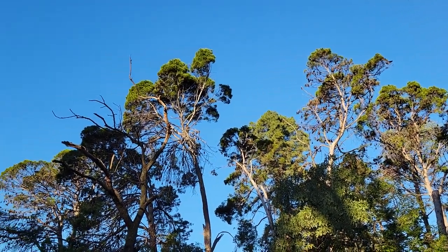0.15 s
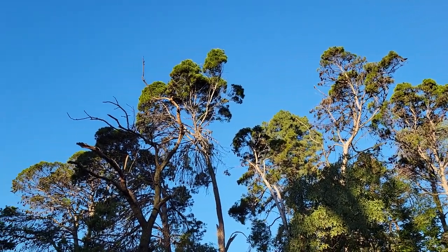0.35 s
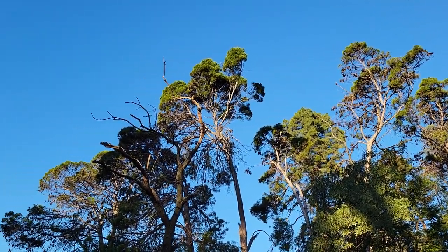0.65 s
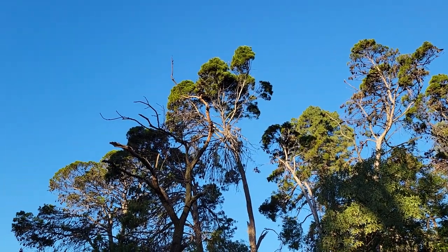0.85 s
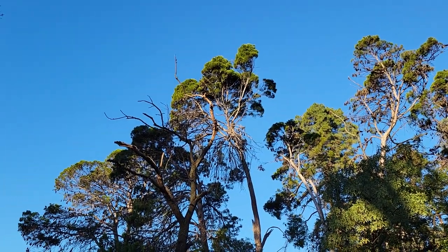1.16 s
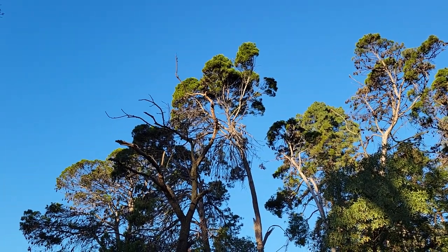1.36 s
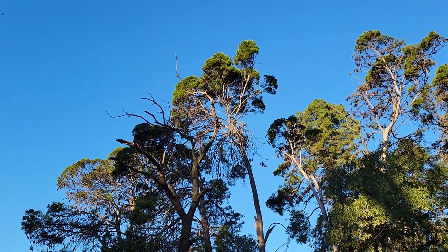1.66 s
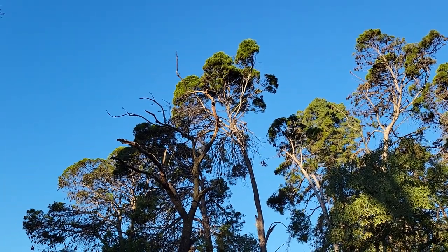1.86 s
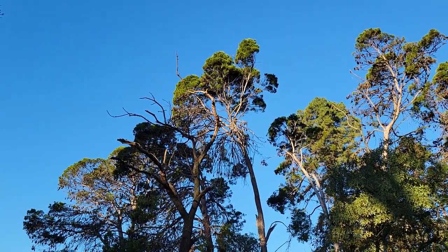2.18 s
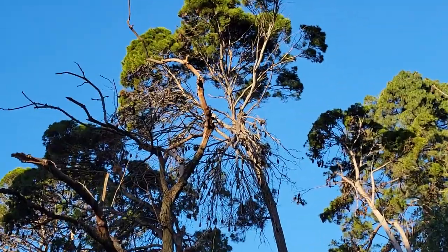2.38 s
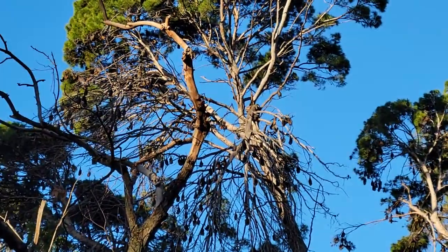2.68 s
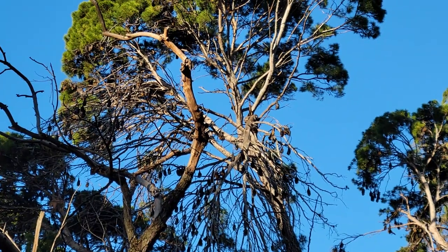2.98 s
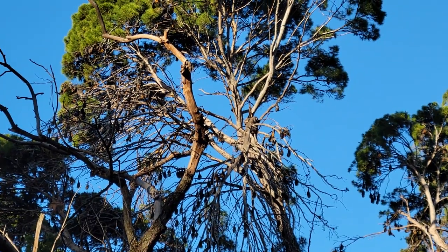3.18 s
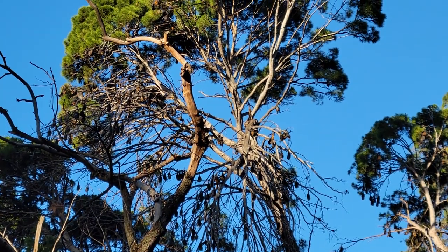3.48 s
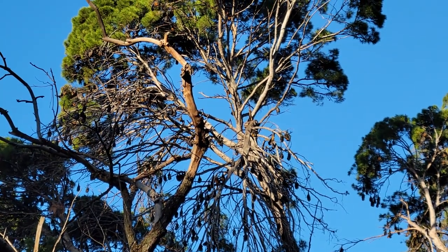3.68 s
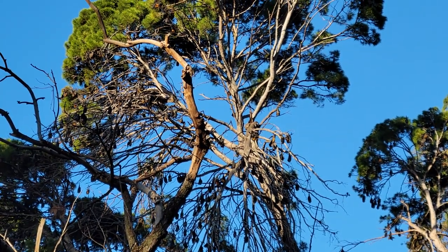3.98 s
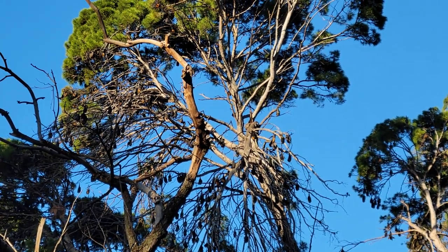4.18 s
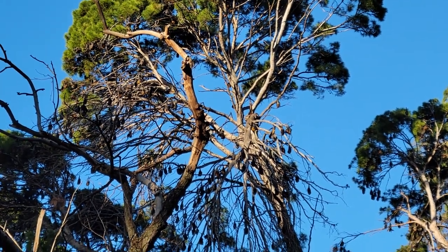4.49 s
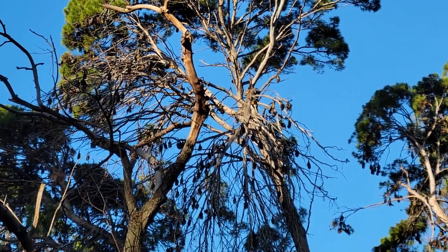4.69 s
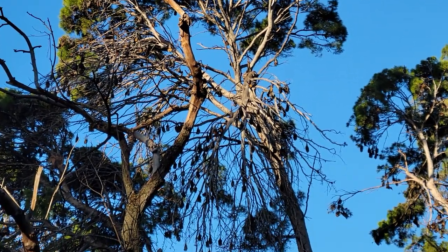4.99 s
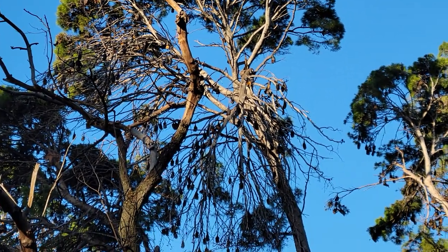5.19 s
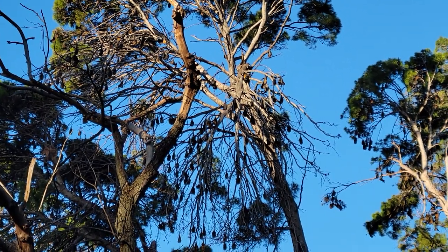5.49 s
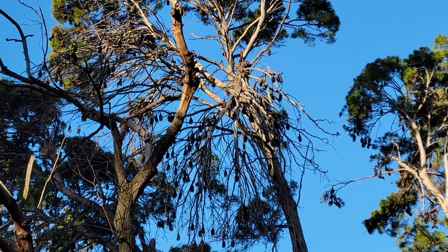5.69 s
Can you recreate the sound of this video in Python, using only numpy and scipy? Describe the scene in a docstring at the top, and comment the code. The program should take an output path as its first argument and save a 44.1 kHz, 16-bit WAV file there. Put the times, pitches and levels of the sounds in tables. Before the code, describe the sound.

Outdoors beneath tall trees, hundreds of roosting bats blend into a dense shrill chatter, with nearer chirps and hoarse screeches standing out. Under it run soft road rumble and a lorry engine that climbs, drops at a gear change around two seconds, and climbs again. The colony gets louder and brighter in the last second and a half. Wide stereo pickup, with a short leafy wash.

```python
"""A colony of flying foxes roosts in tall trees. Hundreds of far voices blur into a shrill chorus, nearer animals squeak
and screech out of it, and a thin high whistle glides twice. A lorry engine pulls away, changes gear and pulls again
over the rumble of a road. Two microphone ports a hand apart; the left one faces the colony."""
import sys
import numpy as np
from scipy import signal
from scipy.fft import rfft, irfft
from scipy.io import wavfile
from scipy.ndimage import uniform_filter1d

SR = 44100
rng = np.random.default_rng(int(sys.argv[2]) if len(sys.argv) > 2 else 0)


def transcribe(u):
    """Save the signal u as a 16-bit wav file named by the first command-line argument.

    u: samples, shape (n,) or (channels, n), limited to [-1, 1]; the rate is SR.
    q: integer samples, one column per channel.
    """
    v = np.clip(np.atleast_2d(u).T, -1, 1)
    q = np.round(v * 32767).astype(np.int16)
    wavfile.write(sys.argv[1], SR, q)


N = 257984

# the chorus swells and sinks: (s, level dB)
CHORUS = [(0.0, -40), (0.28, -43), (1.71, -40), (2.1, -43.5), (2.56, -38.5), (2.66, -44.5), (2.74, -41), (3.49, -38),
          (3.89, -40.5), (4.1, -39.5), (4.12, -40), (4.45, -35), (4.64, -39.5), (4.95, -35.5), (5.05, -32.5), (5.34, -34.5),
          (5.82, -34), (5.85, -35)]
CHORUS_COLOUR = [(710, -46), (1200, -12.5), (1490, -21), (2260, -8), (2800, -1.5), (3400, -1), (5220, -15.5), (8100, -18.5),
                 (9520, -18.5), (10900, -24.5), (12200, -18.5), (12900, -17.5), (14600, -25), (15600, -36)]   # (Hz, dB per Hz)
# far calls a second, and the level in dB of those too far to tell apart
CALLS_PER_S, BLUR_DB = 520, -1   # fixed
# near squeaks, one clear partial each: (s, length s, start Hz, end Hz, dB, left-right dB)
SQUEAKS = [(0.017, 0.054, 4240, 4460, -44, -4), (0.122, 0.043, 4130, 4150, -45, -4), (0.231, 0.08, 4440, 3140, -44.5, -8),
           (0.2, 0.039, 4500, 4700, -44, -6), (0.287, 0.076, 3130, 3070, -47.5, -8), (0.458, 0.068, 3700, 2620, -41.5, -6), (0.702, 0.035, 2850, 2800, -45, -4), (0.702, 0.22, 4500, 4530, -50.5, -7),
           (0.977, 0.09, 4550, 4950, -48, -6), (1.016, 0.09, 2200, 2365, -50, -5), (1.088, 0.04, 3630, 2840, -43, -4), (1.132, 0.028, 3510, 3570, -39, -2),
           (1.31, 0.051, 2910, 2760, -41.5, -7), (1.411, 0.077, 3560, 3260, -40.5, -2), (1.436, 0.044, 3830, 3770, -38, -1),
           (1.508, 0.063, 3950, 3950, -43, -4), (1.642, 0.043, 3630, 3450, -38.5, 1), (1.902, 0.059, 2190, 2420, -47, -8),
           (2.246, 0.067, 2564, 2950, -46, -1), (2.314, 0.09, 2810, 3190, -45, 3), (2.397, 0.075, 2955, 3550, -39.5, -2), (2.42, 0.12, 2450, 2750, -48.5, 2), (2.425, 0.037, 1593, 1800, -43, 0),
           (2.474, 0.11, 2950, 3350, -43.5, -1), (2.482, 0.04, 4570, 4450, -40, 1), (2.552, 0.07, 3240, 3950, -38, 2),
           (2.692, 0.14, 2020, 1966, -45, 4), (2.705, 0.14, 2442, 2452, -41, 3), (2.763, 0.063, 3500, 3440, -41.5, 3),
           (2.862, 0.14, 2480, 2550, -43, 6), (2.952, 0.032, 6120, 5660, -49.5, 1), (2.992, 0.056, 6370, 6260, -47, 1),
           (3.037, 0.06, 3300, 3080, -41, -6), (3.041, 0.12, 2870, 2800, -40, -2), (3.197, 0.081, 3220, 3300, -39, -2),
           (3.223, 0.078, 2700, 2730, -45, -2), (3.357, 0.11, 7500, 7850, -52, -3), (3.301, 0.088, 3020, 2800, -43, 2),
           (3.385, 0.044, 2580, 2706, -41, 4), (3.501, 0.071, 2940, 2790, -41.5, 3), (3.701, 0.08, 2954, 2740, -44.5, 1),
           (3.738, 0.073, 3600, 3270, -42, 2), (4.007, 0.068, 4250, 3300, -38.5, -6.5), (4.039, 0.08, 3240, 3128, -36, 0),
           (4.11, 0.04, 2100, 2000, -43, 3), (4.182, 0.055, 3005, 3310, -41, 0), (4.313, 0.093, 3400, 2996, -37.5, 0), (4.343, 0.08, 2146, 2207, -35.5, 4),
           (4.39, 0.081, 2167, 2475, -38, 4), (4.415, 0.066, 3670, 3630, -45, 5), (4.426, 0.11, 2920, 2850, -38.5, -1),
           (4.775, 0.109, 2118, 2257, -41, 3), (4.869, 0.068, 3343, 3283, -34.5, -3), (4.927, 0.045, 7700, 7400, -50, 2),
           (4.92, 0.093, 2410, 2580, -44.5, 4), (5.001, 0.037, 6630, 6430, -33.5, -8), (5.03, 0.1, 2940, 2950, -33, -1),
           (4.992, 0.031, 3390, 3310, -32, -1), (5.03, 0.065, 2520, 2600, -39, 0),
           (5.111, 0.11, 2660, 2800, -40, 7), (5.23, 0.13, 2820, 3106, -36, 3), (5.245, 0.033, 1100, 1120, -46.5, 9),
           (5.453, 0.042, 7970, 7700, -50, -7), (5.471, 0.13, 2940, 2940, -41, 11), (5.5, 0.12, 7920, 7740, -53.5, -4),
           (5.572, 0.12, 3210, 3560, -40.5, 3), (5.595, 0.078, 7600, 7830, -51, -5), (5.647, 0.086, 4580, 4830, -43.5, 6),
           (5.658, 0.044, 3110, 3100, -39, 6), (5.691, 0.043, 2040, 2096, -43, -2), (5.693, 0.14, 4100, 4150, -40, -1)]
# near screeches: (s, length s, start Hz, end Hz, level dB, dB gained per harmonic, left-right dB)
SCREECHES = [(0.0, 0.064, 2722, 2710, -57, 3, 7), (0.117, 0.066, 3530, 3150, -41, -1.5, -3), (0.36, 0.14, 1860, 1960, -43, -1.5, -2),
             (2.468, 0.05, 4585, 4670, -39, -12, 4), (2.511, 0.09, 4755, 4870, -30.5, -16, 1), (2.599, 0.16, 4250, 4200, -37, -6, -1),
             (3.44, 0.067, 3520, 3240, -37, -4.5, 2), (4.127, 0.14, 1844, 2010, -38.5, -2.5, -1), (4.383, 0.12, 2270, 2560, -53.5, 3.5, -7),
             (4.942, 0.09, 2970, 3230, -32.5, -4, -1), (5.031, 0.36, 3256, 3440, -44.5, 3.5, -5.5)]
# high whistles: (s, Hz, dB)
WHISTLES = [[(2.22, 13000, -70), (2.31, 14400, -66), (2.35, 15100, -63), (2.42, 14500, -66), (2.49, 15100, -61), (2.6, 14720, -60),
             (2.67, 15050, -60), (2.76, 15300, -57), (2.86, 14500, -62), (2.95, 12800, -68)],  # fixed
            [(5.62, 13350, -62), (5.72, 15250, -53), (5.8, 15520, -53)]]  # fixed
# the lorry: (s, firing pattern Hz, dB of its multiples 3, 4 and 5)
LORRY = [(0.0, 29.9, -54, -41, -49), (0.93, 30.6, -49, -49, -51), (1.02, 31.2, -50, -49, -66), (1.53, 35.7, -52, -44, -58), (1.66, 35, -44, -55, -66),
         (2.12, 20.0, -48, -52, -55), (2.38, 19.9, -50, -45, -56), (2.66, 20.4, -44, -46, -43), (2.95, 21.4, -43, -39, -45), (3.55, 23.3, -41, -48, -48),
         (3.81, 24.2, -45, -39, -46), (4.45, 27.9, -48, -43, -54), (5.03, 27.8, -48, -48, -52), (5.42, 29.4, -53, -39, -54),
         (5.85, 31.8, -50, -44, -52)]  # fixed
# the road: (s, rumble dB, tyre roar dB)
ROAD = [(0, -42, -46), (.35, -46, -45), (.7, -41.5, -46), (.9, -46, -45.5), (1.8, -40, -45), (2.28, -45.5, -49.5), (2.5, -40.5, -47),
        (2.9, -39.5, -45.5), (3.6, -39, -46.5), (4.2, -42, -47), (5, -41.5, -47), (5.45, -43.5, -46), (5.85, -40, -46.5)]
RUMBLE = [(8.8, -39), (15, -13), (48, -1.5), (76, -3), (122, -9.5), (182, -20.5), (250, -26), (320, -31), (550, -120)]   # (Hz, dB per Hz)
ROAR = [(76, -42), (130, -18), (183, -13.5), (316, -16.5), (382, -12.5), (627, -15.5), (1470, -16), (2200, -14), (2860, -57),
        (4840, -120)]   # (Hz, dB per Hz)
LIKENESS = [(60, 0.9), (130, 1), (290, 0.82), (640, 0.2), (1400, -0.51), (2200, -0.62)]   # (Hz, left-right likeness of the road)
PORTS = [(100, -0.8), (700, -1.5), (3000, -4), (5200, -1), (7000, -3), (9200, 3), (11000, 2), (12500, -5), (15000, -8.5)]   # (Hz, left-right dB)
LAG_SAMPLES = 16.5   # the right port hears the colony later
TREES_T60_S, TREES_DB = .25, 0
CUTOFF_HZ = 15750   # fixed
HUM = [(0, -44), (.3, -62), (.67, -48.5), (1.19, -38), (1.68, -41.5), (1.95, -63), (3.6, -41.5), (4.7, -46.5), (5, -42), (5.2, -48), (5.45, -42), (5.85, -48)]   # a steadier hum: (s, dB)
# level of the treble: (s, dB of the shrill edge 4-5.4 kHz, dB at 5.4-8.4 kHz, dB above 8.4 kHz)
TREBLE = [(0.0, -41.5, -52, -58), (0.16, -44.5, -53.5, -51.5), (0.28, -50, -50, -59.5), (0.67, -46.5, -57.5, -60.5),
          (0.94, -47, -53, -59), (1.09, -44, -49.5, -51), (1.14, -51.5, -53, -61.5), (1.84, -45, -50, -55.5),
          (2.07, -50, -52, -53), (2.25, -54, -50.5, -60), (2.61, -45.5, -50, -54), (3.0, -52, -51.5, -60),
          (3.49, -45.5, -49.5, -51), (4.01, -50.5, -50.5, -58), (4.22, -48, -50.5, -56), (4.33, -48, -51, -57),
          (4.43, -49, -51, -44.5), (4.58, -46, -46.5, -51), (5.0, -47, -41.5, -50.5), (5.25, -43.5, -42.5, -50),
          (5.47, -42.5, -41, -50), (5.85, -40, -43.5, -53.5)]
THROAT = [(1800, -16), (3500, 0), (5800, -8), (7600, -23), (9800, -11), (12000, -8), (14500, -29)]   # (Hz, dB) colour of a screech
HUM_HZ, HUM_WAVER_HZ = 60.2, 1.48
EDGE_DB = None
FLICKER_DB, FLICKERS_PER_S = 1, 10   # each band flickers on its own
NEAR_TREES_DB = -5   # near animals stand further out of the wash


def amp(db):
    """dB to gain."""
    return 10 ** (np.asarray(db) / 20)


def rms_one(x):
    """Scales to rms 1."""
    return x / np.sqrt(np.mean(x ** 2) + 1e-20)


def in_time(rows):
    """Columns of a curve at every sample."""
    s, *columns = np.transpose(rows)
    return [np.interp(np.arange(N) / SR, s, c) for c in columns]


def at_hz(points):
    """A (Hz, value) table on the bins of an N-point spectrum."""
    hz, value = np.transpose(points)
    return np.interp(np.log(np.arange(N // 2 + 1) * SR / N + 1), np.log(hz), value)


def drift(rate, size):
    """Slow chance of spread 1, a new value rate times a second."""
    return np.interp(np.arange(size) * rate / SR, np.arange(size * rate // SR + 2), rng.standard_normal(int(size * rate // SR + 2)))


def add(out, s, length, start_hz, end_hz, harmonics_db, pan_db, lag, rough, chatter_db, soft=0.71):
    """One call: a harmonic stack that glides; its pitch trembles and its strength stutters."""
    size = int(length * SR) + 64
    along = np.linspace(0, 1, size)
    pitch = (start_hz + (end_hz - start_hz) * along) * (1 + rough * drift(400, size))
    phase = 2 * np.pi * np.cumsum(pitch) / SR + rng.uniform(0, 2 * np.pi)
    call = sum(amp(db) * np.sin(k * phase) for k, db in enumerate(harmonics_db, 1) if k * pitch.max() < .45 * SR)  # fixed
    swell = np.sin(np.pi * along ** 0.9).clip(0) ** soft   # a little quicker to start than to fade
    call = call * swell * amp(chatter_db * drift(90, size)) * np.sqrt(2)
    for side, delay, gain in ((0, 0, amp(pan_db / 2)), (1, lag, amp(-pan_db / 2))):
        at = max(int(s * SR + delay), 0)
        out[side, at:at + size] += gain * call[:N - at]


def trees(x, wet_db):
    """Trunks and leaves scatter a short dying wash, another one at each port."""
    t = np.arange(int(TREES_T60_S * SR)) / SR
    wash = rng.standard_normal((2, len(t))) * amp(-60 * t / TREES_T60_S) * (t > .004)
    wash = wash / np.sqrt((wash ** 2).sum(axis=1, keepdims=True))
    return x + amp(wet_db) * signal.fftconvolve(x, wash, axes=1)[:, :N]


def chorus():
    """Short hoarse far calls at random, mostly from one side, over a blur of still farther ones."""
    levels_db = in_time(CHORUS) + in_time(TREBLE)
    calls = np.zeros((2, N))
    for s, length, pitch, glide, loud, pan, lag, bright, hoarse in rng.random((int(CALLS_PER_S * N / SR), 9)):
        hz = 1700 * 2.9 ** pitch
        overtones_db = 5 * loud - (4 + 6 * bright) * np.arange(8) + rng.normal(0, 1.5, 8)
        spot = LAG_SAMPLES + 2 * (lag - .5) if lag < .45 else 72 * (lag - .72)
        add(calls, s * N / SR, .015 + .06 * length ** 3, hz, hz * (.82 + .34 * glide), overtones_db, 8 * (pan - .5), spot,
            rough=.006 + .04 * hoarse ** 3, chatter_db=5)  # fixed
    calls = rfft(trees(calls, TREES_DB))
    calls = calls / np.sqrt(uniform_filter1d(np.abs(calls) ** 2, size=4000) + 1e-9)   # even colour before the colony's own
    left, other = rng.standard_normal((2, N))
    blur = rfft([left, .35 * np.roll(left, round(LAG_SAMPLES)) + .94 * other]) / np.sqrt(N)  # fixed
    both = (calls + amp(BLUR_DB) * blur) * amp(at_hz(CHORUS_COLOUR))
    steps = [1, above(4056), above(5440), above(8430), 0]
    bands = (rms_one(irfft(both * (low - high), N)) for low, high in zip(steps, steps[1:]))
    return sum(amp(db + FLICKER_DB * drift(FLICKERS_PER_S, N)) * band for db, band in zip(levels_db, bands))


def near_bats():
    """Squeaks are almost pure, screeches are rich and a little hoarse."""
    out, order = np.zeros((2, N)), np.arange(6)
    throat_hz, throat_db = np.transpose(THROAT)
    for s, length, start_hz, end_hz, db, pan_db in SQUEAKS:
        add(out, s, length, start_hz, end_hz, [db, db - 21], pan_db, LAG_SAMPLES, rough=0.013, chatter_db=3.0)
    for s, length, start_hz, end_hz, db, gain_db, pan_db in SCREECHES:
        harmonics_db = db + gain_db * order + np.interp((order + 1) * (start_hz + end_hz) / 2, throat_hz, throat_db)
        add(out, s, length, start_hz, end_hz, harmonics_db, pan_db, LAG_SAMPLES, rough=0.0085, chatter_db=2.5, soft=0.38)
    return trees(out, NEAR_TREES_DB)


def whistles():
    """Thin pure tones near the top of hearing, gliding without corners."""
    out, t = 0, np.arange(N) / SR
    for rows in WHISTLES:
        hz, db = in_time(rows)
        sounding = np.clip(np.minimum(t - rows[0][0], rows[-1][0] - t) / .04, 0, 1)  # fixed
        phase = 2 * np.pi * np.cumsum(uniform_filter1d(hz, size=1500) + 60 * drift(150, N)) / SR
        out = out + sounding * amp(db + 3.5 * drift(40, N)) * np.sqrt(2) * np.sin(phase)
    return out


def lorry():
    """Low orders of the firing pattern, wavering on their way; and the hum."""
    (hz, *orders_db), (hum_db,) = in_time(LORRY), in_time(HUM)
    phase = 2 * np.pi * np.cumsum(hz) / SR
    orders = sum(amp(db + 2.0 * drift(6.1, N)) * np.sin(k * phase + k * k) for k, db in enumerate(orders_db, 3))
    hum = amp(hum_db + 1.0 * drift(6.3, N)) * np.sin(2 * np.pi * np.cumsum(HUM_HZ + HUM_WAVER_HZ * drift(3, N)) / SR)
    return np.sqrt(2) * (orders + hum)


def road():
    """Diffuse traffic noise, alike at both ports only in the bass."""
    rumble_db, roar_db = in_time(ROAD)
    alike = np.clip(at_hz(LIKENESS), -1, 1)
    mid, side = rfft(rng.standard_normal((2, N)))
    noise = np.sqrt(1 + alike) * mid + np.sqrt(1 - alike) * side * [[1], [-1]]
    rumble, roar = (rms_one(irfft(noise * amp(at_hz(colour)), N)) for colour in (RUMBLE, ROAR))
    return amp(rumble_db) * rumble + amp(roar_db) * roar


def above(hz):
    """A smooth step from 0 to 1 across the spectrum."""
    return 1 / (1 + (hz / (np.arange(N // 2 + 1) * SR / N + 1)) ** 12)


def scene():
    """Every sound takes the colour of each port."""
    ports = amp(at_hz(PORTS) / 2 * [[1], [-1]])
    return irfft(rfft(chorus() + near_bats() + whistles() + road() + lorry()) * ports, N)


def record(dry):
    """The top is cut."""
    return signal.sosfilt(signal.cheby2(20, 70, CUTOFF_HZ + 150, fs=SR, output="sos"), dry)  # fixed


dry = scene()
out = record(dry)
transcribe(out)
```